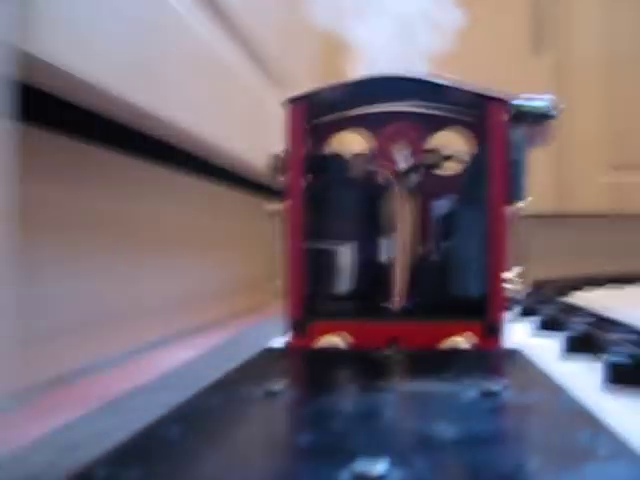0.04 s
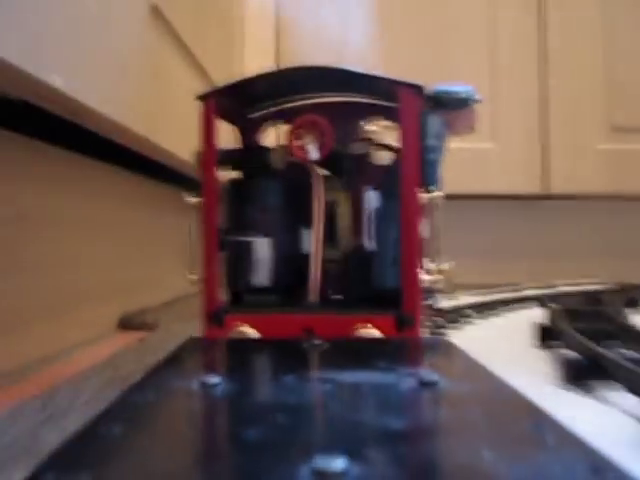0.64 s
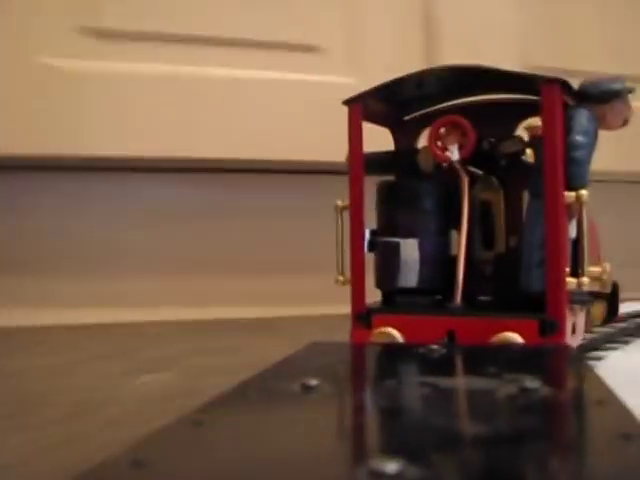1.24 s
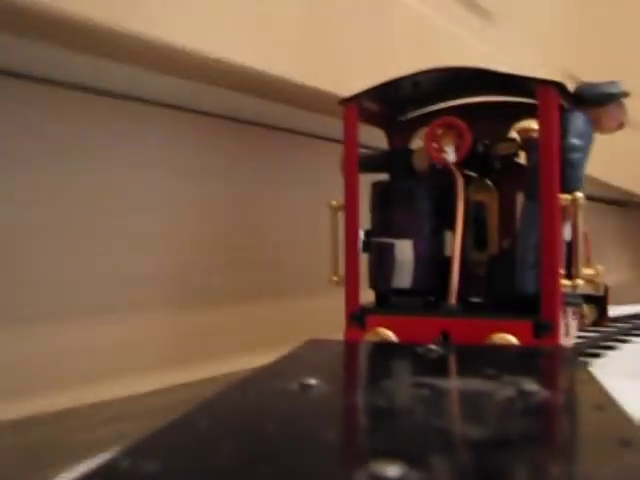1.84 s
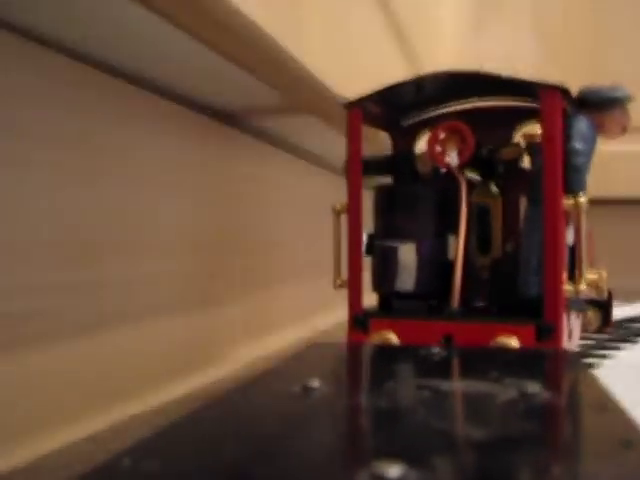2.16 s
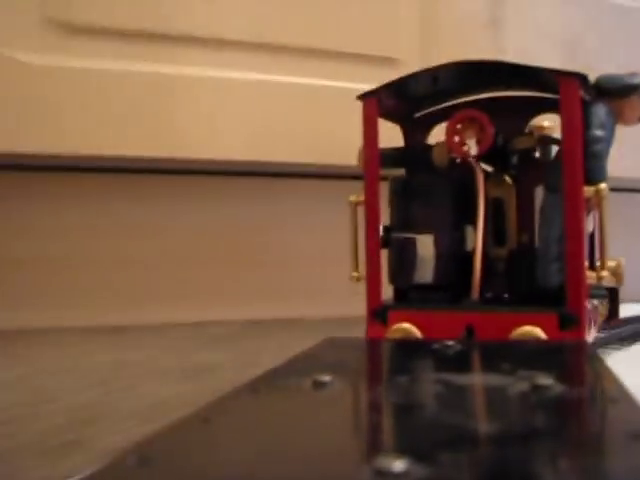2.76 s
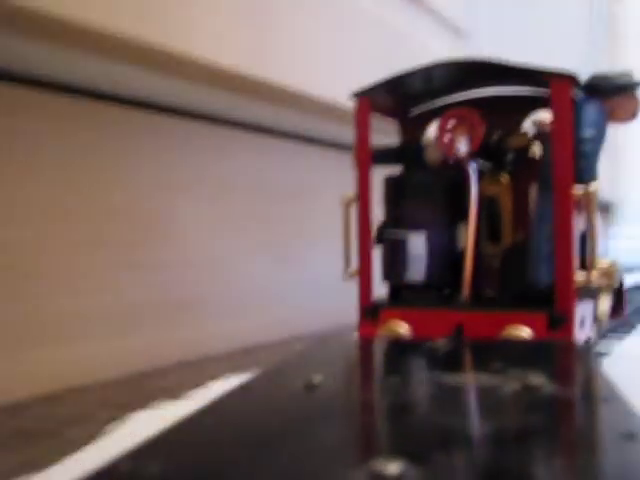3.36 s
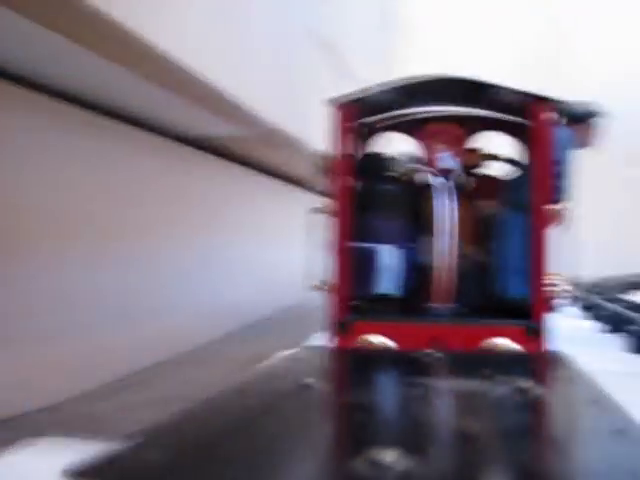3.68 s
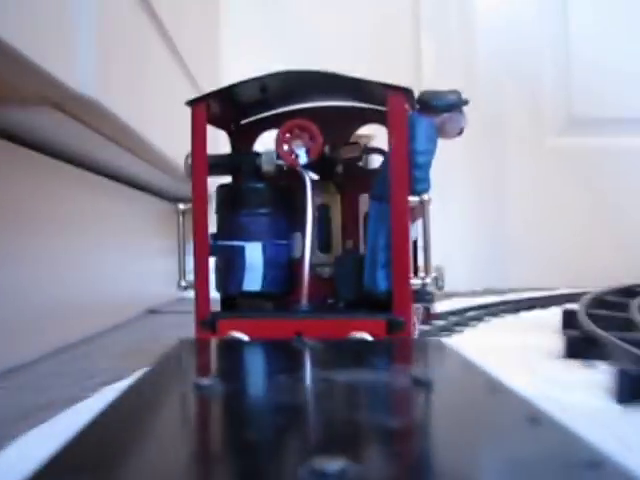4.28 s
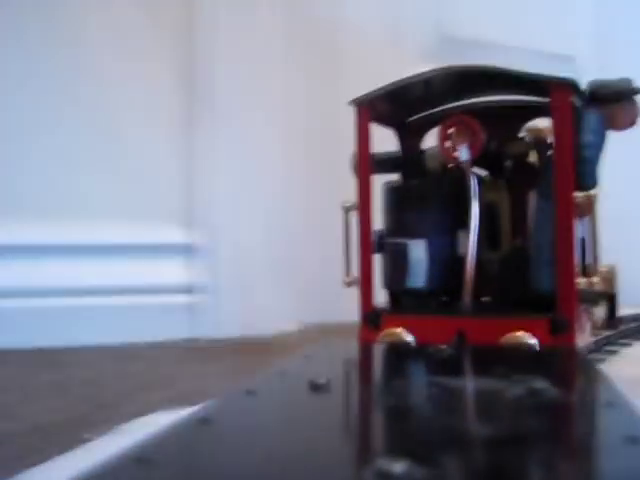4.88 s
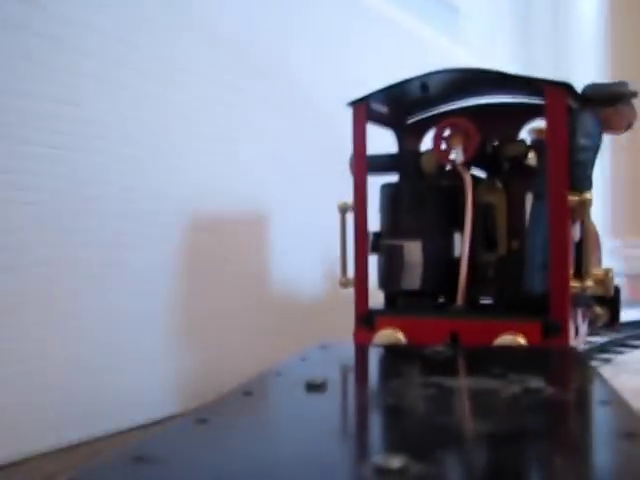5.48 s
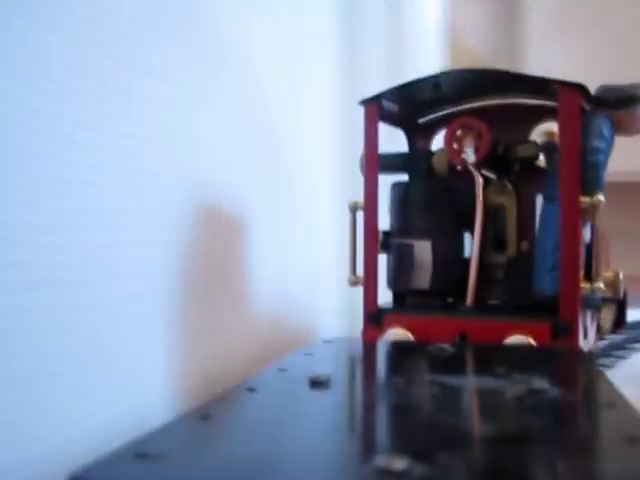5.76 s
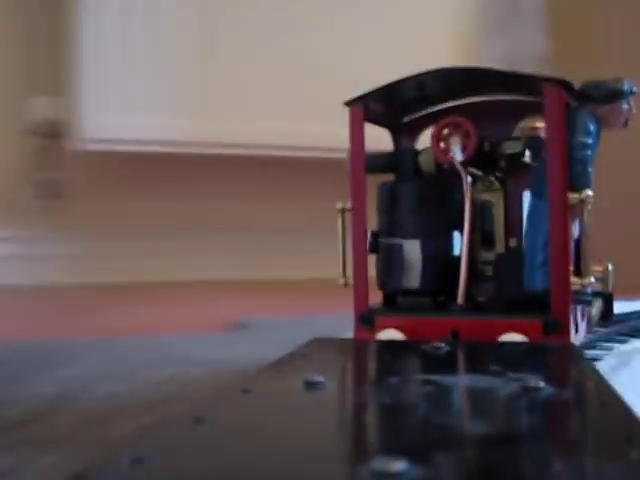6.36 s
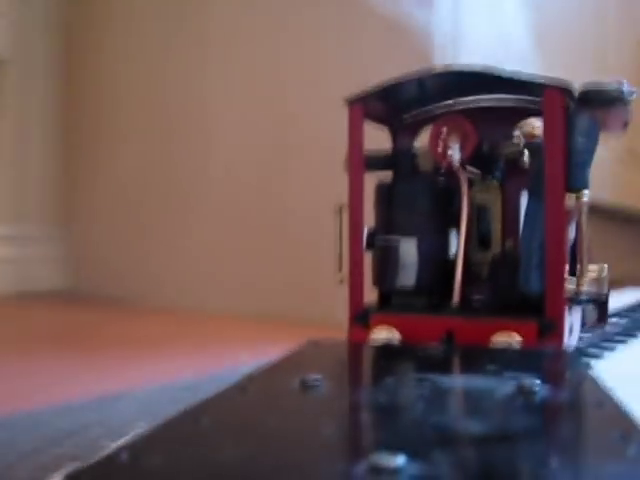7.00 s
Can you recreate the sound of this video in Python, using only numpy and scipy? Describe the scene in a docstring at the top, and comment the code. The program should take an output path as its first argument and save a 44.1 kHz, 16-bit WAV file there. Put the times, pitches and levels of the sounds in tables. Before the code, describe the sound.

A small model steam locomotive runs for the whole seven seconds, heard close up from the wagon it pulls, with a light kitchen echo. The exhaust is a very fast, sputtering chuff, over thirty beats a second, with bright hiss, a thin high ring and occasional harder barks. It quickens a little over the first two seconds and slows slightly after about five.

Underneath, the wheels rumble softly and rattle the sheet-metal deck. Rail joints knock irregularly, and wheels and couplings give sharp steel ticks, clustering around 3 seconds and from 4.3 to 5.

The exhaust's tone sweeps as the train passes near walls at about 0.3, 2, 3.8 and 5.7 seconds. Its high ring briefly spreads in pitch and snaps back at about 2.3 and 3.9 seconds, and a thin metallic sizzle grows around 4.3. The train is still running at the end.

```python
"""A kitchen floor: a small live-steam locomotive pulls a flat wagon round, heard from the wagon.
The exhaust beats four times a wheel turn: a bark, hiss and a high chimney ring, with some beats accented.
The wheels rumble, rattle the sheet-metal deck and knock on rail joints; wheels and couplings tick.
Each time the track swings close to a wall, its echo sweeps through the exhaust's colour."""
import sys
import numpy as np
from scipy import signal
from scipy.fft import rfft, irfft, next_fast_len
from scipy.io import wavfile
from scipy.ndimage import uniform_filter1d, map_coordinates

SR = 44100
rng = np.random.default_rng(int(sys.argv[2]) if len(sys.argv) > 2 else 0)


def transcribe(u):
    """Save the signal u as a 16-bit wav file named by the first command-line argument.

    u: samples, shape (n,) or (channels, n), limited to [-1, 1]; the rate is SR.
    q: integer samples, one column per channel.
    """
    v = np.clip(np.atleast_2d(u).T, -1, 1)
    q = np.round(v * 32767).astype(np.int16)
    wavfile.write(sys.argv[1], SR, q)


N = 318843
TIME_S = np.arange(N) / SR


def amp(db):
    """Decibels to gain."""
    return 10 ** (np.asarray(db) / 20)


def unit(x):
    """Scale to rms 1."""
    return x / np.sqrt(np.mean(np.abs(x) ** 2) + 1e-20)


def along(points, hz):
    """Interpolate (frequency, value) points on a log axis."""
    knots_hz, values = np.transpose(points)
    return np.interp(np.log(hz + 1), np.log(knots_hz + 1), values)


def curves(rows):
    """One per-sample curve for each column after the time."""
    knots_s, *columns = np.transpose(rows)
    return [np.interp(TIME_S, knots_s, column) for column in columns]


def wobble(rate_hz):
    """Smooth random curve, rate_hz knots a second."""
    knots = rng.standard_normal(int(N * rate_hz / SR) + 4)
    return map_coordinates(knots, [TIME_S * rate_hz])


def filtered(x, response):
    """Apply a complex frequency response."""
    size = next_fast_len(N + SR // 2)
    return irfft(rfft(x, size) * response(np.fft.rfftfreq(size, 1 / SR)), size)[..., :N]


# left-right likeness: (frequency [Hz], correlation [1])
COHERENCE = [(30, .97), (110, 0.93), (200, 0.6), (700, 0.84), (1400, 0.16), (2500, 0.9), (4500, 0.19),
             (9000, 0.23), (15000, 0.12)]

def spread(pair):
    """Two unrelated signals to left and right, most alike in the bass."""
    angle = lambda hz: np.arccos(np.clip(along(COHERENCE, hz), -1, 1)) / 2
    mid, side = filtered(pair, lambda hz: np.array([np.cos(angle(hz)), np.sin(angle(hz))]))
    return unit(np.array([mid + side, mid - side]))


def noise(spectrum):
    """Coloured stereo noise, rms 1."""
    return spread(filtered(rng.standard_normal((2, N)), lambda hz: amp(along(spectrum, hz))))


# room decay: (frequency [Hz], t60 [s])
ROOM_DECAY = [(200, 0.08), (2000, 0.81), (12000, 0.054)]

def kitchen_reverb(x):
    """Room tail: each frequency dies at its own rate."""
    hz, t, bins = signal.stft(rng.standard_normal((2, SR // 2)), SR, nperseg=256)
    decay = amp(-60 * t / along(ROOM_DECAY, hz)[:, None])
    tail = signal.istft(bins * decay, SR, nperseg=256)[1]
    tail = np.pad(tail / np.linalg.norm(tail[0]), ((0, 0), (SR // 200, 0)))  # 5 ms pre-delay
    return signal.fftconvolve(x, tail, axes=1)[:, :N]


# deck resonances: (frequency [Hz], width [Hz], level [dB])
DECK_MODES = [(591, 90, -2.5), (738.6, 74, -0.5), (846, 99, -3), (987, 180, -4.5), (1315, 470, -10)]

def deck(x):
    """The sheet-metal deck rings in its modes and hardly radiates below them."""
    def response(hz):
        modes = sum((-1) ** k * amp(db) * 1j * hz * width / (centre ** 2 - hz ** 2 + 1j * hz * width)
                    for k, (centre, width, db) in enumerate(DECK_MODES))
        return modes / (1 + (480 / (hz + 1)) ** 6) / (1 + (hz / 2500) ** 2)
    return filtered(x, response)


# track roughness: (time [s], rattle level [dB], rumble level [dB])
ROUGHNESS = [(0, -28, -44.5), (0.3, -30.5, -52.5), (0.55, -28.5, -46.5), (1.0, -28.5, -48.5),
             (1.68, -26.5, -46), (1.95, -29, -50), (2.3, -26, -46.5), (2.7, -26.5, -47),
             (3.0, -29.5, -47.5), (3.3, -26, -46.5), (3.65, -29.5, -49.5), (3.9, -27.5, -47),
             (4.55, -28.5, -46), (5.25, -27, -48), (5.42, -34, -57.5), (5.65, -31, -49.5),
             (6.2, -31.5, -54), (6.4, -31, -49.5), (7.2, -31, -51)]
# floor rumble: (frequency [Hz], density [dB])
RUMBLE_SPECTRUM = [(20, -27), (45, -11.5), (80, -7), (108, -2), (160, -8.5), (220, -3.5), (300, 3),
                   (430, 2.5), (700, -11), (1500, -47)]

def wheels(bumps_per_s=2200, scatter_db=3, jolt_db=2.28, lumps_db=3):
    """Rough rails bump the wheels and ring the deck; the floor rumbles below."""
    rattle_db, rumble_db = curves(ROUGHNESS)
    hits = rng.random((2, N)) < bumps_per_s / SR
    bumps = hits * rng.standard_normal((2, N)) * amp(scatter_db * rng.standard_normal(N))
    rattle = spread(deck(bumps * amp(jolt_db * wobble(25))))
    rumble = unit(noise(RUMBLE_SPECTRUM) * amp(lumps_db * wobble(45)))
    return amp(rattle_db - 1) * rattle + amp(rumble_db + 2) * rumble


# rail joint knocks: (time [s], level [dB])
KNOCKS = [(0.715, -15), (0.974, -14), (1.215, -14.5), (1.67, -18), (2.079, -16), (2.433, -13), (2.505, -11),
          (3.264, -16.5), (3.994, -12.5), (4.208, -14), (4.676, -15.5), (5.042, -20), (5.813, -14),
          (6.22, -15.5), (6.448, -14.5), (6.601, -11.5), (7.004, -11.5)]

def rail_joints(gain_db=-3, t60_s=0.048, attack_s=0.0021):
    """A wheel drops into a joint and rings the deck's modes, at new strengths each time."""
    out, t = np.zeros(N + SR), np.arange(SR // 5) / SR
    hz, _, mode_db = np.transpose(DECK_MODES)[:, :, None]
    envelope = amp(-60 * t / t60_s) * (1 - np.exp(-t / attack_s))
    for start_s, db in KNOCKS:
        strengths = amp(2 * mode_db + 4.1 * rng.standard_normal(hz.shape))
        modes = strengths * np.sin(2 * np.pi * (hz * t + rng.random(hz.shape)))
        knock = modes.sum(axis=0) * envelope
        out[round(start_s * SR):][:len(t)] += amp(db + gain_db) * knock / np.abs(knock).max()
    return out[:N]


# wheel and coupling ticks: (time [s], level [dB])
TICKS = [(0.2036, -17), (0.596, -10.5), (0.977, -13), (1.354, -17), (1.882, -19), (2.02, -11),
         (2.0794, -12), (2.091, -15), (2.787, -11.5), (2.8606, -10), (2.934, -17), (3.069, -9.5),
         (3.1444, -11), (3.282, -16), (3.8606, -19), (4.2607, -14), (4.468, -8.5), (4.541, -11),
         (4.677, -11), (4.828, -14), (4.904, -12), (5.043, -14), (6.0531, -19), (6.85, -9)]
# small steel parts: (frequency [Hz], level [dB])
STEEL_MODES = [(5400, 5), (5750, 2), (6250, 3.5), (6900, -2), (7600, 1.5), (8100, -2), (8700, -5)]

def steel_ticks(gain_db=-4, ring_t60_s=0.013, crack_t60_s=0.018):
    """Metal touches metal: a crack and a brief ring."""
    out, t = np.zeros((2, N + SR)), np.arange(SR // 20) / SR
    hz, mode_db = np.transpose(STEEL_MODES)[:, :, None]
    for start_s, db in TICKS:
        strengths = amp(mode_db + 3 * rng.standard_normal(hz.shape))
        modes = strengths * np.sin(2 * np.pi * (hz * t + rng.random((2, len(hz), 1))))
        ring = 2 * modes.mean(axis=1) * amp(-60 * t / ring_t60_s)
        crack = rng.standard_normal((2, len(t))) * amp(-60 * t / crack_t60_s)
        out[:, round(start_s * SR):][:, :len(t)] += amp(db + gain_db) * (ring + crack)
    return filtered(out[:, :N], lambda hz: hz / (hz + 900) / (1 + (hz / 11500) ** 6))


# runs alongside a wall: (start [s], end [s], echo lag [ms])
WALL_PASSES = [(0.108, 0.48, 0.38), (2.014, 2.113, 0.29), (3.62, 4.09, 0.36), (5.573, 5.768, 0.23)]

def with_wall_echo(x, approach_ms=1.28, depart_ms=0.72, bend=1.5, fade_ms=0.83, cutoff_hz=3600):
    """A nearer wall echoes sooner and stronger; part bounces again between boiler and wall."""
    lags_ms = [nearest_ms + approach_ms * np.maximum(start_s - TIME_S, 0) ** bend
               + depart_ms * np.maximum(TIME_S - end_s, 0) ** bend
               for start_s, end_s, nearest_ms in WALL_PASSES]
    lag_ms = np.min(lags_ms, axis=0)
    dull = filtered(x, lambda hz: 1 / (1 + (hz / cutoff_hz) ** 4))
    echo = lambda ms: np.array([map_coordinates(ch, [np.arange(N) - ms * SR / 1000]) for ch in dull])
    gain = 0.8 * np.exp(-lag_ms / fade_ms)
    return x + gain * (echo(lag_ms) + 0.96 * gain * echo(2 * lag_ms))


# water in the chimney: (starts gathering [s], blows clear [s])
WATER = [(1.82, 2.275), (3.33, 3.875)]
# chimney ring, rising branch: (frequency [Hz], density [dB])
RISING_SPECTRUM = [(6000, -60), (8300, -17), (8650, 0.5), (8900, 5), (9400, -1.5), (10100, -0.5),
                   (10800, -5), (12000, -8)]
# chimney ring, falling branch: (frequency [Hz], density [dB])
FALLING_SPECTRUM = [(5000, -70), (7500, -4), (8200, -1), (8800, -4), (10500, -70)]

def chimney_ring(creep_hz=1700, bend=0.93, flutter_hz=120, flare_db=2.5):
    """Gathering water splits the high ring into a rising and a falling branch until it clears."""
    wet = sum(np.clip((TIME_S - start_s) / (clear_s - start_s), 0, 1) ** bend * (TIME_S < clear_s)
              for start_s, clear_s in WATER)
    shifted = lambda x, hz: np.real(signal.hilbert(x) * np.exp(2j * np.pi * np.cumsum(hz) / SR))
    rising = shifted(noise(RISING_SPECTRUM), wet * (creep_hz + flutter_hz * wobble(250)))
    falling = shifted(noise(FALLING_SPECTRUM), -wet * creep_hz)
    ring = rising * amp(flare_db * np.sqrt(wet)) + amp(-4) * falling * np.sqrt(wet)
    return filtered(ring, lambda hz: 1 / (1 + (hz / 11200) ** 24))


def patchy(x, depth_db):
    """Each puff of wet steam favours its own few hundred Hz."""
    bins = signal.stft(x, SR, nperseg=256)[2]
    patches = uniform_filter1d(rng.standard_normal(bins.shape[1:]), size=3, axis=0)
    patches = uniform_filter1d(patches, size=7, axis=1)
    return unit(signal.istft(bins * amp(depth_db * unit(patches)), nperseg=256)[1][:, :N])


# steam hiss: (frequency [Hz], density [dB])
HISS_SPECTRUM = [(300, -70), (1500, -36), (3400, 5), (4700, 5), (5050, 2.5), (5800, -6), (7800, -6.5),
                 (9000, -8.5), (10500, -11), (12000, -16), (15000, -32), (15750, -26), (16100, -21)]
# steam hiss: (time [s], level [dB])
HISS_LEVEL = [(0, -33.5), (0.35, -35), (0.6, -32.5), (1.3, -33), (1.9, -32.5), (2.3, -33), (2.7, -32),
              (3.05, -34.5), (3.75, -34), (3.95, -32), (4.45, -32.5), (5.0, -34.5), (5.6, -33.5),
              (6.15, -35.5), (6.4, -34), (7.2, -34.5)]
# thin metallic sizzle: (frequency [Hz], density [dB])
SIZZLE_SPECTRUM = [(4000, -90), (5050, -15), (5330, 3), (5550, -9), (6200, -90)]
# thin metallic sizzle: (time [s], level re hiss [dB])
SIZZLE_LEVEL = [(0, -18), (3.8, -17), (4.3, -7), (4.7, -13), (5.3, -11.5), (7.2, -13)]

def steam_hiss(flow, gain_db=3, pulse_power=0.66):
    """The jet hisses, rings and sizzles, following the beats more softly than the bark."""
    pulse = np.abs(uniform_filter1d(flow, size=SR // 250)) ** pulse_power
    running_rms = np.sqrt(np.abs(uniform_filter1d(pulse ** 2, size=SR // 4)))
    envelope = pulse / running_rms * amp(curves(HISS_LEVEL)[0] + gain_db)
    steam = noise(HISS_SPECTRUM) + amp(-1) * chimney_ring()
    sizzle = amp(curves(SIZZLE_LEVEL)[0]) * noise(SIZZLE_SPECTRUM)
    return envelope * patchy(steam + sizzle, depth_db=2.6)


# accented exhaust beats: (time [s], level [dB])
ACCENTS = [(0.0379, -6), (0.077, -3.5), (0.2027, -4.5), (0.392, -9), (0.417, -7), (1.355, -6),
           (1.7724, -9.5), (1.8506, -6), (1.9824, -9), (2.8937, -3), (3.6437, -9), (3.749, -16),
           (3.962, -20), (4.1006, -4.5), (5.224, -8), (5.359, -5), (5.937, -10), (6.173, -14), (6.739, -8)]

def exhaust_accents(spectrum, gain_db=-9, rise_s=0.0012):
    """A stronger beat leaves the chimney in one short, hard bark."""
    envelope, t = np.zeros(N + SR), np.arange(SR // 30) / SR
    burst = t / rise_s * np.exp(1 - t / rise_s)
    for start_s, db in ACCENTS:
        envelope[round(start_s * SR):][:len(t)] += amp(db + gain_db) * burst
    return envelope[:N] * noise(spectrum)


# driving wheels: (time [s], speed [turns/s])
WHEEL_SPEED = [(0.0, 7.788), (1.4, 9.434), (2.4, 9.703), (2.6, 9.414), (3.0, 9.591), (3.4, 9.202),
               (4.4, 9.572), (5.0, 9.18), (5.6, 8.568), (5.8, 8.616), (7.2, 8.233)]
# unevenly set valves: (opening phase [turns], time open [s], level [dB], scatter [dB])
VALVES = [(0.026, 0.028, -1, 1), (0.279, 0.013, -1.54, 1), (.53, 0.038, -2.1, 0), (0.754, 0.15, 0.94, 0.5)]
# engine effort: (time [s], level [dB])
EFFORT = [(0, -14), (0.15, -14), (0.3, -18.5), (0.7, -16.3), (1.0, -13.5), (1.6, -14.2), (2.25, -17),
          (2.78, -14), (3.4, -15.5), (3.7, -15), (4.25, -16.5), (4.55, -15), (5.2, -14.5), (5.35, -16),
          (5.5, -19), (5.95, -17), (6.15, -19.5), (7.1, -15.5)]

def steam_flow(start_turns=0.45, opening_s=0.0039, emptying_s=0.015, leak_db=-34):
    """Each valve opens quickly, its cylinder empties and it shuts; a little steam always leaks."""
    flow = np.zeros(N)
    turns = start_turns + np.cumsum(curves(WHEEL_SPEED)[0]) / SR
    for phase, open_s, db, scatter_db in VALVES:
        onset_turns = np.arange(np.ceil(turns[0] - phase), turns[-1] - phase) + phase
        for onset_s in np.interp(onset_turns, turns, TIME_S):
            span = slice(*np.searchsorted(TIME_S, [onset_s, onset_s + 2 * open_s]))
            age_s = TIME_S[span] - onset_s
            port = (1 - np.exp(-(age_s / opening_s) ** 2)) * np.exp(-(age_s / open_s) ** 4)
            strength = amp(db + scatter_db * rng.standard_normal())
            flow[span] += strength * port * np.exp(-age_s / emptying_s)
    return np.hypot(flow * amp(curves(EFFORT)[0]), amp(leak_db))


# low chimney resonances: (frequency [Hz], density [dB])
BARK_SPECTRUM = [(300, -38), (700, -16.5), (1000, -15), (1450, -10), (1750, -3), (2050, 2), (2400, -0.5),
                 (3000, 2), (3500, -8), (4500, -25.5), (6000, -19.5), (9000, -31)]

def exhaust(bark_gain_db=0.4, sputter_db=0.5):
    """Wet steam sputters up the chimney: a bark in its low resonances, with hiss and accented beats."""
    flow = steam_flow() * amp(sputter_db * wobble(320))
    bark = amp(bark_gain_db) * flow * patchy(noise(BARK_SPECTRUM), depth_db=2.5)
    return bark + steam_hiss(flow) + exhaust_accents(BARK_SPECTRUM)


def scene():
    """Engine and wagon, close by in the kitchen."""
    train = with_wall_echo(exhaust()) + wheels() + rail_joints() + steel_ticks()
    return train + amp(-12.5) * kitchen_reverb(train)


# microphone balance: (frequency [Hz], left minus right [dB])
BALANCE = [(60, 2), (250, -3), (700, 1.5), (1290, 2), (2380, -4), (4400, 0.1), (8000, 0.5), (15000, 1)]
BAND_LIMIT_HZ = 15950

def record(dry):
    """Two band-limited microphone ports, slightly unlike in colour."""
    colour = lambda hz: amp(np.outer([.5, -.5], along(BALANCE, hz)))
    return filtered(dry, lambda hz: colour(hz) * (hz < BAND_LIMIT_HZ))


dry = scene()
out = record(dry)
transcribe(out)
```